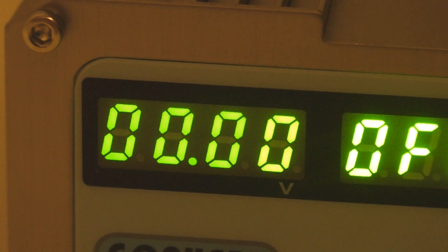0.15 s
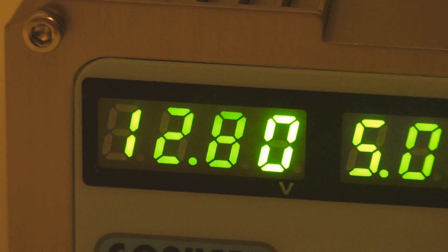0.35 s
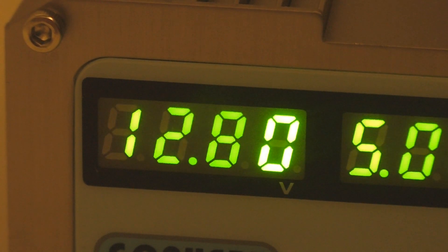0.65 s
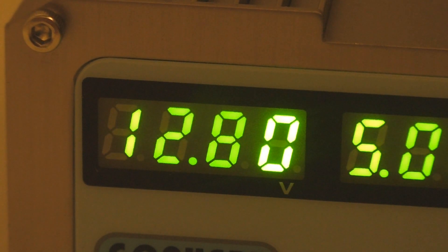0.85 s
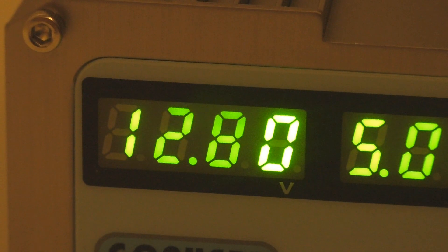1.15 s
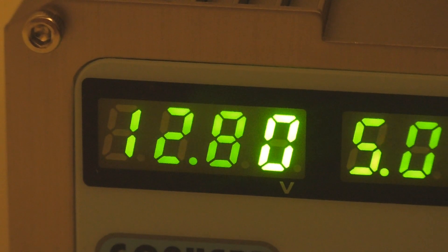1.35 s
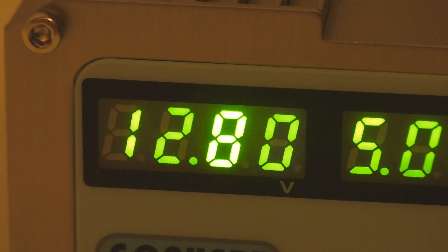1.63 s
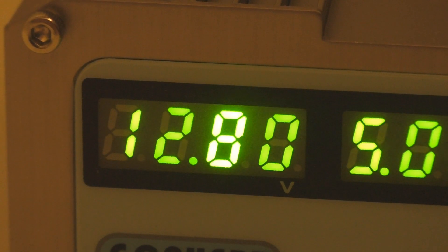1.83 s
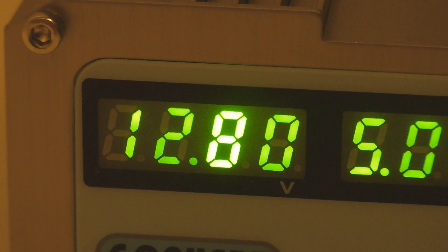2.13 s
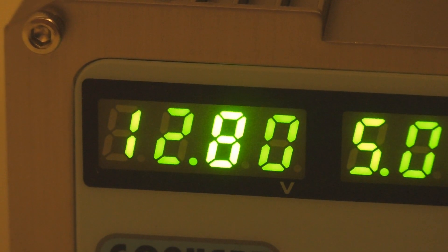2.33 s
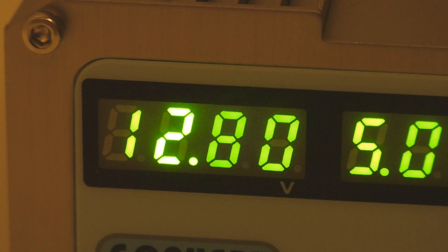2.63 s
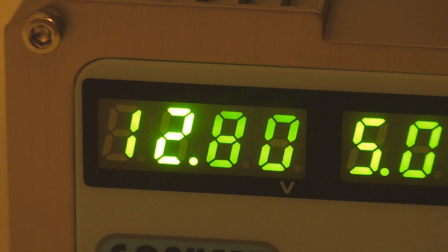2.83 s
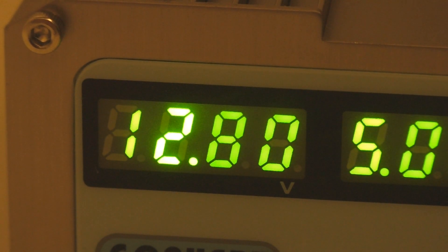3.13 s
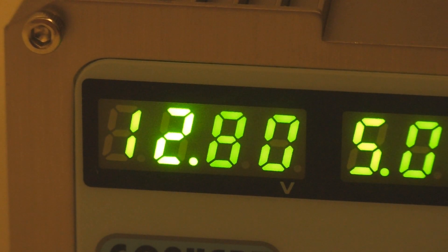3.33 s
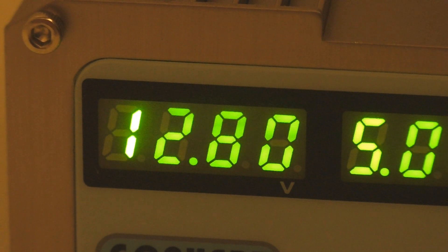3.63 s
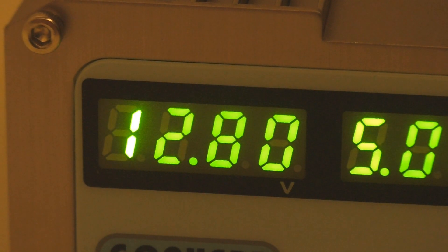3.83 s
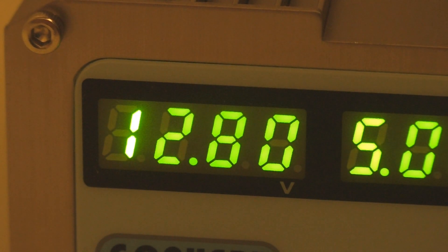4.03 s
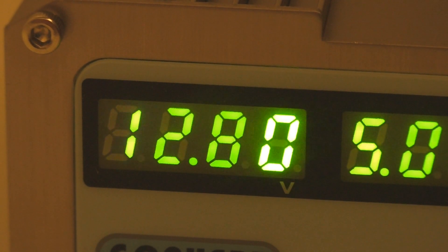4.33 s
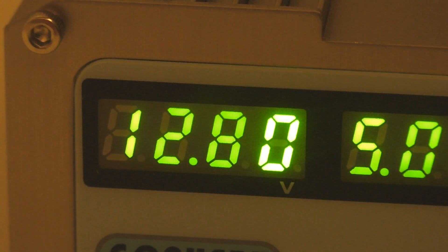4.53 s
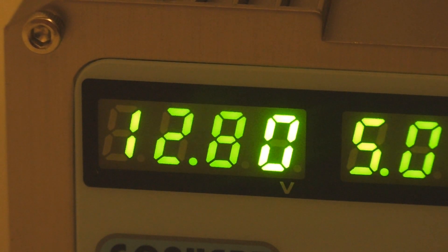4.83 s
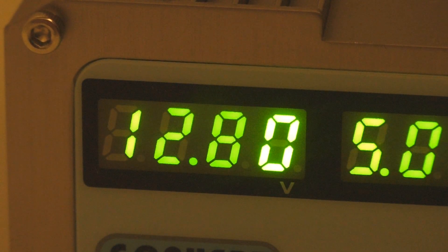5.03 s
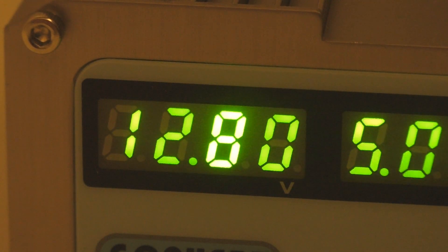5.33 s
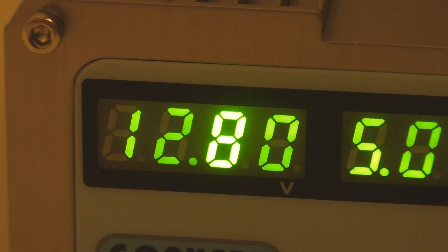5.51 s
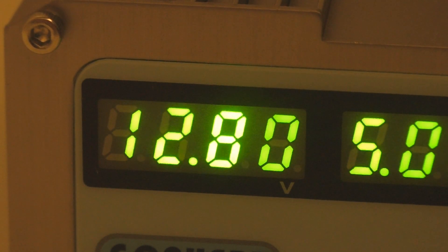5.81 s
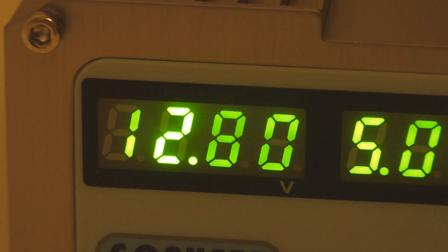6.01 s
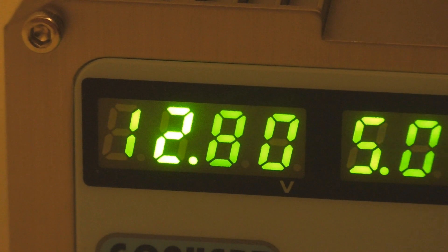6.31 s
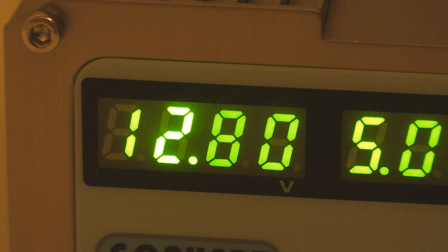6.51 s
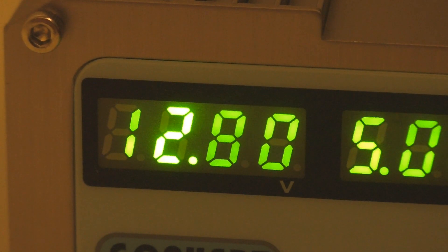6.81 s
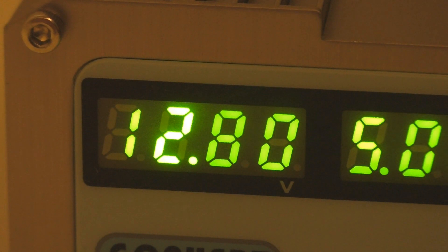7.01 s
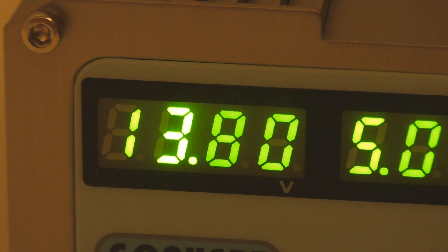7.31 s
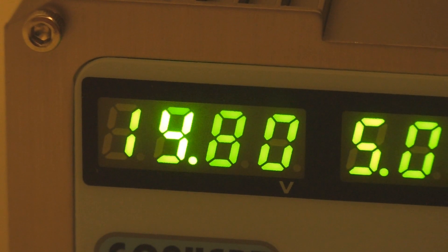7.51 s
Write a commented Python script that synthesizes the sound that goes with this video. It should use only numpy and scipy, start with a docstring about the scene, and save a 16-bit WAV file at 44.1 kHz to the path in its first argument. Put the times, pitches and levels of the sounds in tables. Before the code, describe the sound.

Seven pairs of switch clicks, crisp going in and lower, hollower coming back, with short panel resonance and a brief small-room echo. After the last pair the knob is handled and turned: light plastic rattles, soft bumps, a faint tick and a tiny high squeak at the end. Close stereo microphone, nearly centred, over a steady but slightly wavering faint hum and low room rumble.

```python
"""A knob on a bench power supply, close to the microphone, is pushed in and let go seven times, then turned.
Each switch snap rings damped panel modes under a noise tick: bright going in, duller coming back.
Shaped noise makes ticks of the knob and soft finger bumps; wavering sines make its thin squeaks.
A small room answers with decaying noise echoes; behind lie mains hum (sines), low rumble and hiss (noise)."""
import sys
import numpy as np
from scipy import signal
from scipy.fft import rfft, irfft
from scipy.io import wavfile

SR = 44100
rng = np.random.default_rng(int(sys.argv[2]) if len(sys.argv) > 2 else 0)


def wav_record(signal):
    """Record a signal, one row per channel, as 16-bit PCM in the file named by sys.argv[1]."""
    frames = np.transpose(np.atleast_2d(signal))
    bounded = np.clip(frames, -1, 1)
    # unit amplitude maps onto the largest positive 16-bit level
    quanta = np.round(bounded * 32767).astype(np.int16)
    wavfile.write(sys.argv[1], SR, quanta)


N = 337850  # samples

# air of the room and microphone hiss, spectral shape: [f/Hz, relative level/dB per Hz]
AIR_SPECTRUM = [(10, -36), (26, -9.5), (45, -15.5), (75, -12.5), (95, -1.5), (109, -4.5), (135, 0),
                (200, -14.5), (390, -19), (620, -29), (1500, -26.5), (3200, -34.5), (6300, -46),
                (10500, -39.5), (16000, -39)]
# likeness of that air at left and right: [f/Hz, likeness 0 to 1]
AIR_LIKENESS = [(30, 0.694), (110, 0.917), (500, 0.691), (2000, 0.278), (6000, 0.397), (12000, 0.604)]
# slow level of the bass, rumble and hum alike: [t/s, relative level/dB]
BASS_SWELL = [(0, -2.5), (.85, -3), (1.6, 2), (2.2, -2), (2.6, 1), (4.25, -1.5), (4.5, 2), (6.7, 1.5),
              (7.05, -2), (7.6, 1.5)]
# hum of the mains transformer and a fainter tone above it: [f/Hz, level before swell and waver/dB]
HUM_TONES = [(120, -56.5), (250, -74.5)]
# how long the room's echo lasts: [f/Hz, t60/s]
ROOM_DECAY = [(100, 0.02), (400, .26), (800, 0.24), (1400, 0.2945), (2500, 0.1651), (4700, 0.2743),
              (12000, 0.02)]
# colour of the room's echo: [f/Hz, echo level/dB]
ECHO_COLOUR = [(80, -6.5), (300, -8), (450, -8), (700, -15), (1300, -17), (2400, -11.5), (3300, -13),
               (4700, -10.5), (6500, -10), (14000, -10)]
# left minus right for the sound of the knob and panel: [f/Hz, difference/dB]
STEREO_BALANCE = [(100, -0.67), (400, -0.76), (750, 0.5), (1300, 2.5), (2400, -0.05), (4400, 0),
                  (8000, -0.2)]
# fingers shift on the knob and softly bump the case: [t/s, level/dB, upper f/Hz]
FINGER_BUMPS = [(1.20, -44, 160.3), (1.38, -51, 240), (4.58, -51, 297.5), (5.36, -51.5, 199.6),
                (5.53, -52, 180), (6.155, -51.5, 399.4), (6.27, -54, 420), (6.671, -45.5, 159.4)]
# thin squeaks of the knob: [t/s, length/s, f/Hz, level/dB]
KNOB_SQUEAKS = [(5.816, 0.044, 9280, -66), (5.854, 0.033, 9320, -74.5), (7.556, 0.073, 8657, -60.5),
                (7.617, 0.036, 8660, -69)]
# the knob ticks in its play under the fingers: [t/s, level/dB, centre f/Hz, t60/s]
KNOB_TICKS = [(1.592, -52, 5000, 0.064), (3.153, -58.5, 5000, 0.052), (5.9806, -43.5, 1940, 0.07),
              (6.156, -52, 3800, 0.136), (6.190, -55, 5000, 0.126), (6.2140, -41.5, 2710, 0.0855),
              (7.236, -50, 900, 0.044)]
# resonances of the small switch parts: [f/Hz, half-width at half gain/Hz, relative level/dB, t60/s]
SWITCH_PARTS = [(1575, 460, -4, 0.04), (2282, 772, 3, 0.0923), (3293, 228, -1.5, 0.0696),
                (4100, 260, -10, 0.074), (4835, 505, -8.5, 0.0945), (6370, 600, -12, 0.0695),
                (8070, 1330, -11.5, 0.062), (10240, 1490, -9.5, 0.0429), (13030, 1800, -18, 0.037)]
# modes of the front panel and case: [f/Hz, t60/s, level when pressed/dB, level when released/dB]
PANEL_MODES = [(152, 0.167, -45.5, -36.5), (253, 0.0111, -26, -21), (234.4, 0.12, -36, -31),
               (297.8, 0.184, -53, -43.5), (310.9, 0.171, -47, -41.5), (374.73, 0.0855, -31, -28.5),
               (405.1, 0.0394, -29.5, -27.5), (391.83, 0.192, -42, -40), (523.5, 0.181, -49.5, -48),
               (454.3, 0.2, -43, -42.5), (492.8, 0.0394, -34.5, -34), (612.8, 0.1015, -41.5, -38),
               (626.7, 0.0488, -34, -29), (697.8, 0.0382, -29, -25.5), (1125.3, 0.0505, -22, -31.5),
               (1222.7, 0.145, -38, -48), (1308.6, 0.0314, -13.5, -29), (1597.8, 0.00627, 1, -19),
               (1534.4, 0.095, -34.5, -46), (1638.5, 0.0459, -41, -33.5), (1681.6, 0.01197, -3, -20),
               (1908.6, 0.0826, -33, -42), (2045.4, 0.071, -34, -48.5), (2234, 0.0329, -23, -44),
               (2371.4, 0.0685, -30.5, -51.5), (2609.6, 0.048, -34.5, -50), (3015, 0.0091, -26.5, -48.5),
               (3371, 0.055, -42.5, -57), (4047, 0.0206, -35, -53.5), (4404, 0.0082, -33.5, -51)]
# the switch snaps in, always much alike: [t/s, strength of ring and thud/dB]
PRESS_SNAPS = [(0.2111, -1), (1.5085, .5), (2.4335, -0.5), (3.3085, -0.59), (4.2099, -0.83), (4.9201, -0.5),
               (5.6662, -1)]
# the switch springs back as freely as the finger lets it:
# [t/s, strength of ring and thud/dB, contact tick/dB, thud in the bench/dB]
# the contact tick has its own level, whatever the strength; the thud is relative to strength
RELEASE_SNAPS = [(0.4087, 1, -33, -40), (1.7117, 0, -47.5, -44.5), (2.6490, -1.5, -41, -43.5),
                 (3.5524, -1.66, -48, -37.5), (4.4097, -1, -48, -38.5), (5.1479, -0.5, -48, -38),
                 (5.9313, -0.9, -50, -42)]

AIR_DB, RUMBLE_DB = -50.5, 0.02  # the rumble is set relative to the air
BUMP_PEAK_S = 0.0195
# a firm touch starts at once, a lighter one more slowly:
# rise time at the firm level, and the drop in level that doubles it
FIRM_DB, FIRM_RISE_S, RISE_DOUBLING_DB = -42.5, 0.00071, 6
# usual contact ticks, and the thud of a press in the bench
PRESS_TICK_DB, PRESS_THUD_DB, RELEASE_TICK_DB = -31, -50, -45.5
# a sharper contact favours high panel modes: dB per octave for each dB of tick above the usual one
HARDENING = 0.067
BAND_LIMIT_HZ = 15880


def gain_of(db):
    """Turns decibels into a factor."""
    return 10 ** (np.asarray(db) / 20)


def evened(x):
    """Scales to rms 1."""
    return x / np.sqrt(np.mean(x ** 2) + 1e-20)


def read(points, hz):
    """Joins (f/Hz, value) points on a log-frequency axis."""
    f, value = np.transpose(points)
    return np.interp(np.log(hz + 1), np.log(f + 1), value)


def add(mix, s, sound):
    """Lays a sound into the mix at time s, cut off at the end."""
    part = mix[..., round(s * SR):][..., :sound.shape[-1]]
    part += sound[..., :part.shape[-1]]


def bins(x):
    """Frequencies of the spectrum of x, in Hz."""
    return np.fft.rfftfreq(x.shape[-1], 1 / SR)


def coloured(x, db):
    """Filters x by one gain in dB per frequency."""
    return irfft(rfft(x) * gain_of(db), x.shape[-1])


def fade(t, t60):
    """Exponential decay, 60 dB in t60."""
    return np.exp(-np.log(1000) * t / t60)


def drift(count, hz):
    """Slow random wander of rms 1, mostly below hz."""
    x = rng.standard_normal(count)
    lowpass = 1 / (1 + (bins(x) / hz) ** 4)
    return evened(irfft(rfft(x) * lowpass, count))


def noise_pair(count, alike):
    """White noise at the two microphone ports, partly shared."""
    left, other = rfft(rng.standard_normal((2, count)))
    alike = np.clip(alike, 0, 1)
    right = alike * left + np.sqrt(1 - alike ** 2) * other
    return irfft(np.array([left, right]), count)


def bass_swell():
    """The slow rise and fall of the bass, in dB."""
    return np.interp(np.arange(N) / SR, *np.transpose(BASS_SWELL))


def air(rumble_hz=210, flutter_db=1.0, swell_db=1.33):
    """A low rumble that swells and flutters by chance, under smooth hiss."""
    hz = np.fft.rfftfreq(N, 1 / SR)
    noise = noise_pair(N, read(AIR_LIKENESS, hz))
    whole = evened(coloured(noise, read(AIR_SPECTRUM, hz)))
    rumble = irfft(rfft(whole) / (1 + (hz / rumble_hz) ** 4), N)
    hiss = whole - rumble
    swell = swell_db * drift(N, hz=1.4)
    flutter = flutter_db * drift(N, hz=5.1)
    level_db = RUMBLE_DB + bass_swell() + swell + flutter
    return gain_of(AIR_DB) * (hiss + rumble * gain_of(level_db))


def hum(waver_db=2, wander=0.314):
    """Low tones of the running equipment, wavering in level and wandering (radians) in phase."""
    phase = 2 * np.pi * np.arange(N) / SR
    tones = np.zeros(N)
    for hz, db in HUM_TONES:
        tone = np.sqrt(2) * np.sin(hz * phase + wander * drift(N, hz=2))
        tones += gain_of(db) * tone
    return tones * gain_of(bass_swell() + waver_db * drift(N, hz=0.79))


def room(x, delay=0.00185, build=0.0038):
    """Echoes thicken a few milliseconds after the sound; each band dies at its own speed."""
    hz, t, z = signal.stft(noise_pair(SR // 2, alike=0.42), SR, nperseg=256)
    t60 = read(ROOM_DECAY, hz)[:, None]
    # long and short decays carry equal energy before the colour is applied
    unit_energy = np.sqrt(2 * np.log(1000) / (t60 * SR))
    tail = signal.istft(z * unit_energy * fade(t, t60), SR, nperseg=256)[1]
    tail_t = np.arange(tail.shape[1]) / SR
    tail = tail * np.clip((tail_t - delay) / build, 0, 1)
    tail = coloured(tail, read(ECHO_COLOUR, bins(tail)))
    return signal.fftconvolve(x, tail, axes=1)[:, :N]


def finger_bumps(lowest_hz=85, order=4):
    """Dull pushes with no ring: low noise that swells and dies."""
    out, t = np.zeros(N), np.arange(SR // 2) / SR
    swell = t / BUMP_PEAK_S * np.exp(1 - t / BUMP_PEAK_S)
    for s, db, hz in FINGER_BUMPS:
        band = signal.butter(order, [lowest_hz, hz], "bandpass", fs=SR, output="sos")
        thud = evened(signal.sosfilt(band, rng.standard_normal(len(t))))
        add(out, s, gain_of(db) * thud * swell)
    return out


def knob_squeaks(waver=0.0044):
    """Rubbing plastic sings briefly on one high, unsteady note."""
    out = np.zeros(N)
    for s, length, hz, db in KNOB_SQUEAKS:
        count = int(length * SR)
        turns = np.cumsum(hz * (1 + waver * drift(count, hz=250))) / SR
        note = np.sin(2 * np.pi * turns) * signal.windows.tukey(count, .6)
        add(out, s, gain_of(db) * note)
    return out


def switch_bands(hz):
    """Gain of each switch resonance per frequency, 1 at its centre."""
    centre, width = np.transpose(SWITCH_PARTS)[:2, :, None]
    return 1 / (1 + ((hz - centre) / width) ** 2)


def switch_colour(hz):
    """All switch resonances together, as dB per frequency."""
    width, db = np.transpose(SWITCH_PARTS)[1:3, :, None]
    power = (gain_of(db) * switch_bands(hz)) ** 2 / width
    return 10 * np.log10(power.sum(0))


def knob_ticks(slope_db=3.0, ring_share=0.442):
    """Light plastic touches, each a short rasp around its own pitch, tinted by the switch parts."""
    out, t = np.zeros((2, N)), np.arange(SR // 4) / SR
    for s, db, hz, t60 in KNOB_TICKS:
        rise = FIRM_RISE_S * 2 ** ((FIRM_DB - db) / RISE_DOUBLING_DB)
        noise = noise_pair(len(t), alike=0.59)
        octaves = np.log2((bins(noise) + 1) / hz)
        tint_db = ring_share * switch_colour(bins(noise))
        rasp = evened(coloured(noise, tint_db - slope_db * octaves ** 2))
        add(out, s, gain_of(db) * rasp * (1 - np.exp(-t / rise)) * fade(t, t60))
    return out


def bench_thump(t, hz=88, peak=0.028):
    """The push passes through the case into the bench, which swells into a low thud."""
    return np.sin(2 * np.pi * hz * t) * (t / peak * np.exp(1 - t / peak)) ** 2


def contact_tick(t, crack_db=1, crack_t60=0.0129, crack_hz=4000, rise=0.00046):
    """A bright crack with a dense rattle in which each resonance dies at its own speed."""
    hz = bins(t)
    # the crack is thin below crack_hz
    thinning_db = 20 * np.log10(1 + (crack_hz / (hz + 1)) ** 2)
    noise = noise_pair(len(t), alike=0.93)
    crack = evened(coloured(noise, switch_colour(hz) - thinning_db))
    tick = gain_of(crack_db) * crack * fade(t, crack_t60)
    for band, (_, _, db, t60) in zip(switch_bands(hz), SWITCH_PARTS):
        noise = noise_pair(len(t), alike=0.7)
        rattle = evened(irfft(rfft(noise) * band, len(t)))
        tick = tick + gain_of(db) * rattle * fade(t, t60)
    return tick * (1 - np.exp(-t / rise))


def panel_ring(t, mode_db, lowest_hz=90):
    """Struck modes; neighbours in the table swing in opposite senses, so the ring builds over a few cycles."""
    hz, t60 = np.transpose(PANEL_MODES)[:2, :, None]
    sense = (-1) ** np.arange(len(PANEL_MODES))
    modes = np.sin(2 * np.pi * hz * t) * fade(t, t60)
    ring = (sense * gain_of(mode_db)) @ modes
    # a small panel radiates little bass
    return signal.lfilter(*signal.butter(2, lowest_hz, "highpass", fs=SR), ring)


def switch(snaps, mode_db, usual_tick_db, vary_db):
    """Each snap strikes the same spot, so the ring and the tick repeat with small changes."""
    out, t = np.zeros((2, N)), np.arange(2 ** 13) / SR
    shared_tick = contact_tick(t)
    octaves = np.log2(np.transpose(PANEL_MODES)[0] / 700)
    for s, db, tick_db, thud_db in snaps:
        tilt_db = HARDENING * (tick_db - usual_tick_db) * octaves
        chance_db = vary_db * rng.standard_normal(len(PANEL_MODES))
        ring = panel_ring(t, mode_db + tilt_db + chance_db)
        body = gain_of(db) * (ring + gain_of(thud_db) * bench_thump(t))
        # part of the tick repeats, part is new at each snap
        tick = 0.371 * shared_tick + 0.3946 * contact_tick(t)
        add(out, s, body + gain_of(tick_db) * tick)
    return out


def scene():
    """The knob close to the microphone, its echo, and the background of air and hum."""
    background = (air() + hum()) * gain_of([[-.5], [.5]])  # the right side a little louder
    pressed_db, released_db = np.transpose(PANEL_MODES)[2:]
    pushes = [(s, db, PRESS_TICK_DB, PRESS_THUD_DB) for s, db in PRESS_SNAPS]
    presses = switch(pushes, pressed_db, PRESS_TICK_DB, vary_db=0.62)
    releases = switch(RELEASE_SNAPS, released_db, RELEASE_TICK_DB, vary_db=1.2037)
    knob = finger_bumps() + knob_squeaks() + knob_ticks() + presses + releases
    half_each = np.array([[.5], [-.5]])
    knob = coloured(knob, half_each * read(STEREO_BALANCE, bins(knob)))
    return knob + room(knob) + background


def record(dry):
    """The recorder's band limit, a steep low-pass."""
    lowpass = signal.firwin(511, BAND_LIMIT_HZ, window=("kaiser", 9), fs=SR)
    return signal.oaconvolve(dry, lowpass[None], "same")


dry = scene()
out = record(dry)
wav_record(out)
```